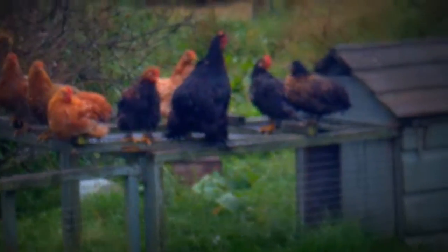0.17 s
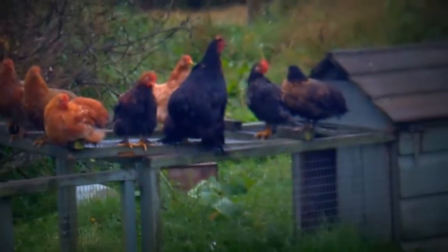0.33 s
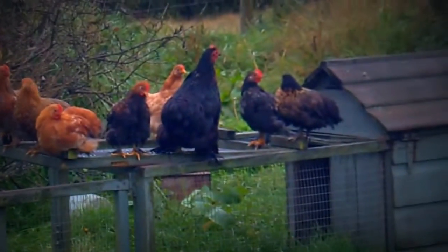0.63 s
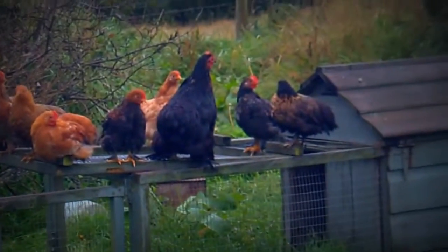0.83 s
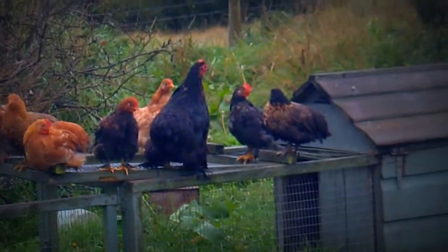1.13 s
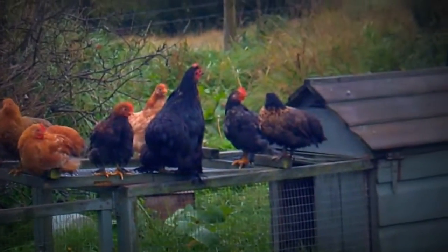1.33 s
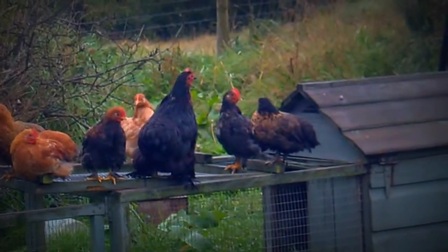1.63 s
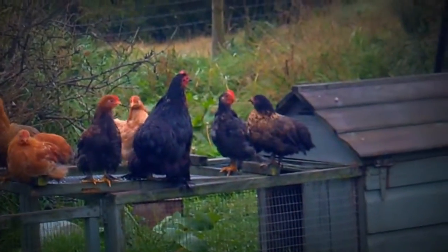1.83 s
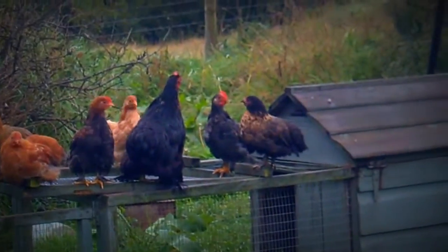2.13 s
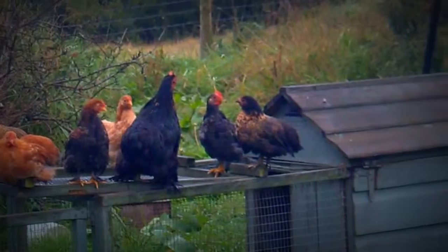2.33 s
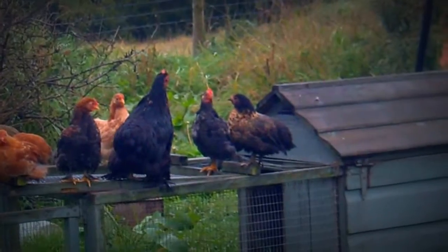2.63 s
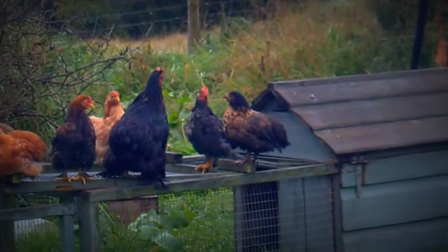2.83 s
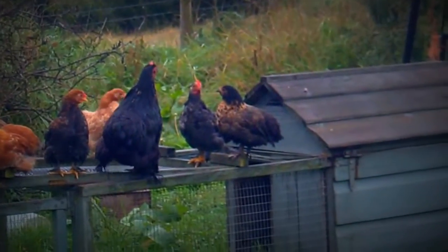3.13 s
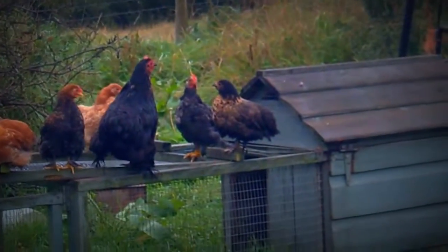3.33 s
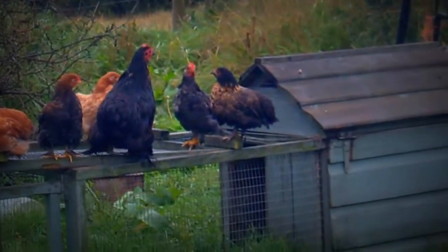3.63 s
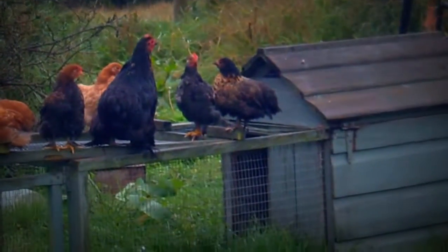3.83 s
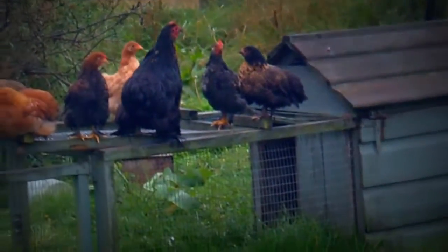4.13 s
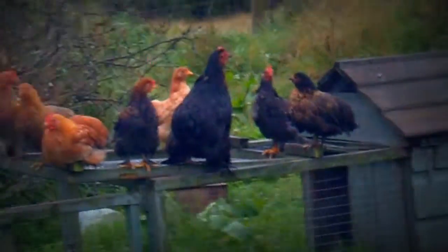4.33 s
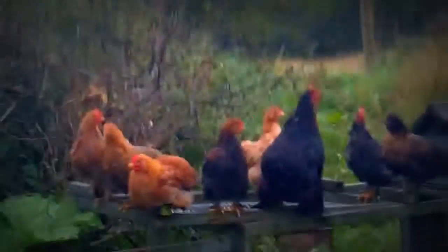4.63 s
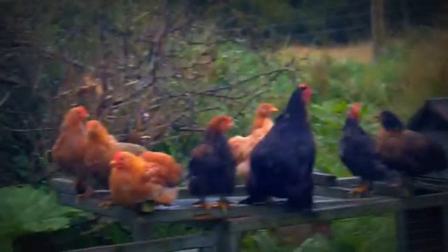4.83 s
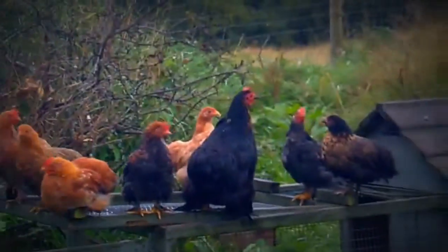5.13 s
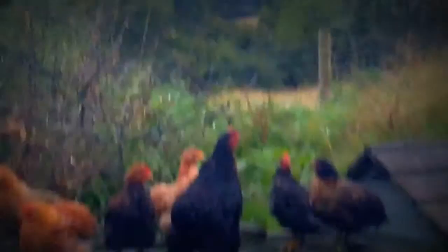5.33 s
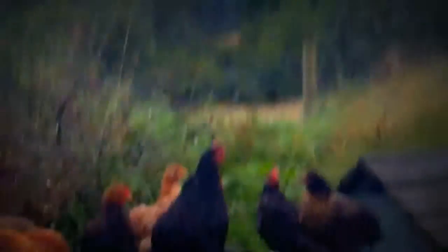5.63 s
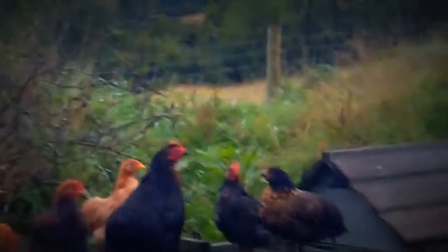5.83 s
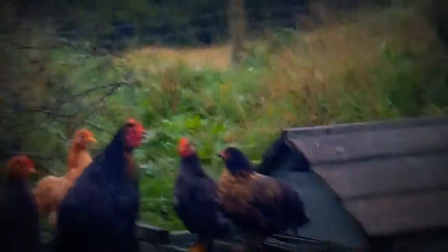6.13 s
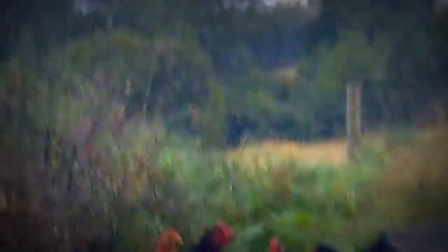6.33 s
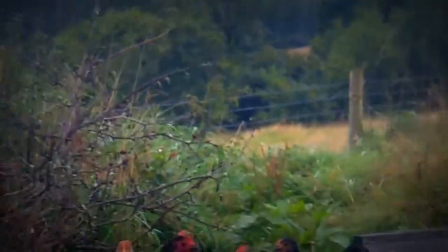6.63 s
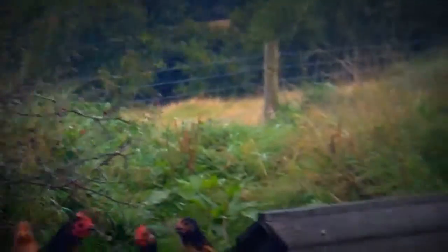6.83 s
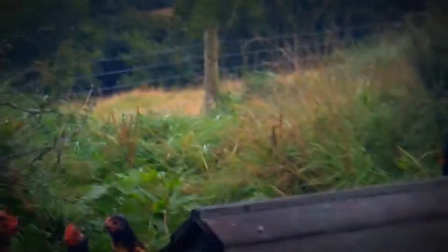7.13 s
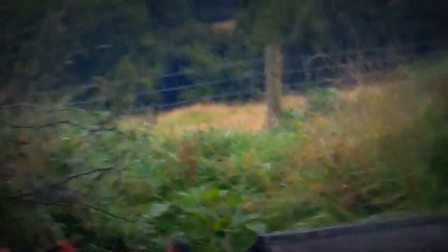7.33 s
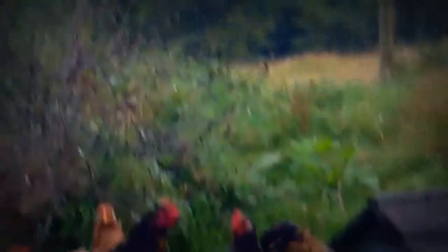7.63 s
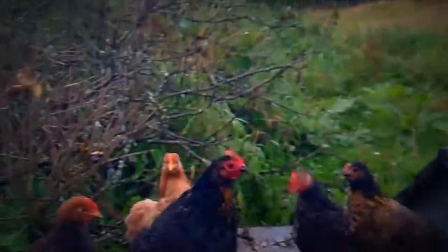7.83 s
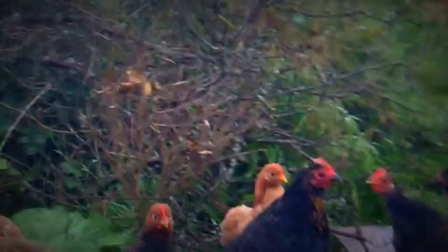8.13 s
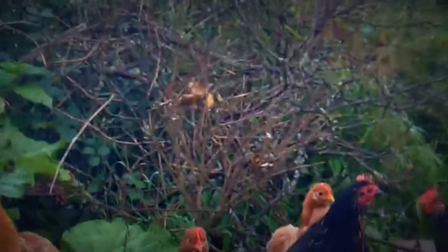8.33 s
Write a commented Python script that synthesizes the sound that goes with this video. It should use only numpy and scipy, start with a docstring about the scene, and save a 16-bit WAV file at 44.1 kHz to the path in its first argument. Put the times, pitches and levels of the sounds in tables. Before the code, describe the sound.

Hens call in alarm in an open garden: rising squawks that start hoarse, clear into a tone and crack, separated by short, arched clucks. Small distant birds trill and chirp between them. Coop, hedge and trees return short, faint echoes. Later come light taps and dry, grainy rustles. The microphone picks up low outdoor air, a barely audible drone and constant thin high electronic whine.

```python
"""A small bird trills further off as a hen in a garden ends a squawk; then come arched clucks, a buzzy cackle,
a second squawk, more clucks and a last squawk. Each long call starts hoarse, locks into a clearer tone and
breaks down; syrinx pulses ring through a filter for the throat, and coop, hedge and trees echo the birds.
Chirps, falling near-sines, are scattered through; from the middle on come light taps and soft rustles of noise.
Under it all lie quiet outdoor air, a faint distant drone and a thin whine like camera electronics."""
import sys
import numpy as np
from scipy import signal
from scipy.fft import rfft, irfft
from scipy.io import wavfile
from scipy.ndimage import uniform_filter1d, minimum_filter1d

SR = 44100
rng = np.random.default_rng(int(sys.argv[2]) if len(sys.argv) > 2 else 0)


def unload_audio(sound):
    """Save the sound as a 16-bit wav file, at the path given as the first command line argument."""
    columns = np.transpose(np.atleast_2d(sound))
    # keep every value between -1 and 1, then stretch to whole-number steps
    steps = np.round(np.clip(columns, -1, 1) * 32767)
    wavfile.write(sys.argv[1], SR, steps.astype(np.int16))


N = 374405
TIME = np.arange(N) / SR  # s

# Clucks, loud and muttered: start_s, hold_s, top_pitch_hz, level_db (below 3150 Hz),
# brightness_db (above 3150 Hz, relative to below), half_pitch_share at first (0-1), roughness (0-1)
CLUCKS = [(1.077, 0.033, 687.4, -34.5, 6, 0.5, 0.05), (1.327, 0.058, 845, -31.5, -0.5, 0.87, 0.3),
          (1.471, .014, 778, -55.5, 5.5, 0.4, 0.2), (1.639, .034, 831, -32, -0.5, 0.64, .2),
          (3.377, 0.034, 689, -33, 5.5, 0.27, 0.03), (3.626, 0.048, 837, -32.5, 1, 1, 0.26),
          (3.889, 0.048, 845, -33, 1.5, .45, 0.4), (4.216, .052, 856, -31.5, 0, 0.37, 0.22),
          (5.326, 0.0087, 697, -58, 6.5, 0.8, 0.7), (5.513, 0.0077, 688, -55, 5, 0.8, 0.5),
          (5.807, 0.036, 810, -75, 27, 0.6, 0.8), (5.905, 0.037, 815, -66.5, 18.5, .5, 0.56),
          (8.482, .02, 737, -62, 20.5, 0.6, 0.5)]
# Held part of each long call: time_s, pitch_hz, level_db, brightness_db (as for the clucks)
FIRST_SQUAWK = [(0.0, 780, -34, 4.5), (0.02, 841, -35, -1), (0.09, 1006, -27.5, 2.5),
                (0.188, 1016, -26, -2.5), (0.204, 1027, -26.5, -5), (0.219, 1139, -24.5, 0)]
CACKLE = [(1.826, 752.2, -46.5, 8), (1.838, 737, -47.5, 10), (1.86, 797, -35.5, 7.9),
          (1.902, 787.7, -32.5, 6.5), (1.938, 760.5, -41.5, 14), (1.96, 799, -34, 1.5)]
SECOND_SQUAWK = [(2.285, 724, -32.5, -0.5), (2.297, 823, -32, 0), (2.361, 867, -32, 0),
                 (2.371, 916, -32.5, 1.5), (2.403, 974.4, -28.5, 2), (2.475, 992, -26.5, 1.5),
                 (2.519, 971, -29, -2), (2.543, 918, -32, 6.5), (2.555, 946, -30.5, -2)]
LAST_SQUAWK = [(6.295, 717, -30.5, 4.9), (6.315, 709, -28, 1), (6.327, 765, -29, 6.1),
               (6.341, 680, -30, 8.2), (6.347, 714, -30, 1.7), (6.365, 897, -28.5, 11),
               (6.399, 933.3, -30, 18.8), (6.479, 967, -30.5, 16.3), (6.497, 993, -26.5, 8.4),
               (6.509, 1060, -20.5, 8.6), (6.519, 1119, -22, 7.1)]
# Voices of the first, second and last squawk, then the cackle: locks_at_s, hoarse_roughness (0-1),
# locked_roughness (0-1), hoarse_half_pitch_share (0-1), locked_half_pitch_share (0-1),
# strained_roughness at the end (0-1), attack_s, release_s, fundamental_weight_db
LONG_CALL_VOICES = [(0.049, .24, 0.08, 0, 0.01, .8, .02, 0.032, 2),
                    (2.375, .29, .05, 0.01, 0.01, 0.18, 0.0221, 0.037, -1.5),
                    (6.358, 0.22, 0.09, 0.3, 0.03, 0.27, .027, 0.033, -0.5),
                    (1.845, 0.64, .16, 0.2, 0.34, 0.7, 0.0159, 0.02, -1)]
# Throat resonances with the beak open, for each kind of call: frequency_hz, gain_db
CLUCK_THROAT = [(400, -49.5), (680, -14.5), (850, -6), (1100, -2), (1700, 2.5), (2100, -9.5), (2600, -29),
                (3000, 2), (3400, -4.5), (4150, 7), (5000, -2), (5600, -14.5), (6400, -24), (13000, -35)]
SQUAWK_THROAT = [(400, -32.5), (700, -11), (950, -3.5), (1450, 0.5), (2200, -3.5), (2600, -17), (3000, -4),
                 (3900, 2.5), (4800, 5), (5300, -3), (5800, -14.5), (6500, -26.5), (8500, -27),
                 (13000, -38.5)]
CACKLE_THROAT = [(400, -36), (790, -7.5), (1200, -20), (1600, 5.5), (2000, 1), (2600, -18.5), (3200, -2),
                 (4000, 1), (4750, 10), (5500, 5.5), (6400, -15.5), (13000, -31.5)]
# Throat with the beak nearly shut: frequency_hz, gain_db
NARROW_THROAT = [(400, -37.5), (690, -12), (1050, 2.5), (1400, 4.5), (2150, -8), (2600, -15.5), (3000, 0.5),
                 (3550, -7), (4100, 5), (4750, 10.5), (5500, -14.5), (6300, -30), (13000, -38.5)]
# Hiss of turbulence at the syrinx: frequency_hz, gain_db
RASP_COLOUR = [(600, -2), (1500, -6.5), (2500, 5.5), (3500, 7.5), (4550, 1.5), (5500, 11.5), (7000, 8.5),
               (13000, -7)]
# Falling chirps of small birds: start_s, length_s, start_pitch_hz, end_pitch_hz, peak_level_db
CHIRPS = [(0.696, 0.068, 3700, 2950, -48), (0.858, 0.024, 4800, 3980, -49.5),
          (0.873, 0.053, 3700, 3000, -50.5), (1.797, 0.033, 4200, 2990, -47),
          (4.564, 0.18, 3900, 3820, -58), (5.03, 0.026, 5350, 5000, -53), (5.117, 0.043, 5350, 4950, -56),
          (5.192, 0.029, 5300, 4920, -54), (6.914, 0.17, 3970, 3960, -56), (7.565, 0.023, 5450, 4900, -53),
          (7.58, 0.047, 4450, 4130, -60)]
# Echoes from ground, coop and hedge: delay_s, level_db
EARLY_ECHOES = [(.0034, -17.5), (0.0125, -33), (0.022, -20.5)]
# Light taps: start_s, peak_level_db (before a shared trim)
TAPS = [(4.699, -33), (4.81, -36.5), (4.858, -35.5), (6.9846, -47.5), (7.2764, -34), (8.358, -40)]
# Soft rustles: start_s, peak_s, end_s, peak_level_db (before a slight flutter)
RUSTLES = [(5.66, 5.695, 5.884, -43), (6.644, 6.797, 7.06, -49.5), (7.048, 7.16, 7.3, -45),
           (7.313, 7.373, 7.8, -56), (7.93, 8.036, 8.1, -49), (8.014, 8.127, 8.35, -48)]
# Spectrum of rustles, taps and trill clicks: frequency_hz, gain_db
RUSTLE_COLOUR = [(300, -24.5), (1000, -12), (2500, -11), (3700, -6.5), (4600, 1), (5600, -10.5),
                 (7000, -14.5), (13000, -25)]
# Spectrum of the outdoor air: frequency_hz, gain_db
AIR_COLOUR = [(15, -46.5), (25, -7.5), (98, -9), (128, -9.5), (158, -7.5), (366, -5.5), (490, -4.5),
              (573, -5.5), (2380, -11), (5100, -13.5), (6130, -16.5), (6990, -19.5), (7570, -10),
              (8190, -19), (13500, -20)]
# Faint distant drone: time_s, level_db (before a slow wander)
DRONE = [(0, -86), (2.5, -80), (3.6, -75.5), (5.3, -74.5), (6.9, -79), (8.4, -85.5)]

TOP_HZ = 13850  # upper limit of the microphone chain and of the syrinx partials
LEAD_S = 0.035  # room for the attack ahead of each held part

# A cluck arches up to its top pitch, swells a little and loses its half pitch on the way
REST_HZ, ARCH_SHARE, ARCH_TOP_SHARE = 680, 0.62, 0.6
SWELL_DB, SWELL_S, UNDOUBLE_S = 4, 0.011, 0.016
CLUCK_ATTACK_S, CLUCK_RELEASE_S, CLUCK_WEIGHT_DB = 0.01986, 0.025, 1

# Pace of the lock and of the final strain in a long call
LOCK_S, CRACK_ROUGH, STRAIN_S = 0.0091, 0.11, 0.01

# Every call opens low, dull and broken; the dB values are reductions
ATTACK_HZ, ATTACK_DB, ATTACK_DULL_DB = 630, 17.5, 15
ATTACK_BEND, ATTACK_HALF, ATTACK_ROUGH = 1.3, 1, 0.74

# Every call ends in a break to slack pitch, falling level and thin rasp
RELEASE_DB, RELEASE_BEND, RELEASE_THIN_DB = 24, 1.27, 7
BREAK_S, BREAK_HZ, BREAK_HALF, BREAK_ROUGH = 0.015, 508, 0.74, 0.95

# The dry trill: evenly spaced notes with a little scatter in time and strength
TRILL_START_S, TRILL_NOTE_S, TRILL_DB = 0.24, 0.0338, -39.5
TRILL_SCATTER_S, TRILL_SCATTER_DB = 0.0023, 1.5

AIR_DB = -57
WHINE_HZ, FLIPS_PER_S = 7689.6, 29.297


def hens():
    """Place the clucks, the three squawks and the cackle in time."""
    out = np.zeros(N)
    for start, *settings in CLUCKS:
        add(out, start - LEAD_S, cluck(*settings))
    curves = (FIRST_SQUAWK, SECOND_SQUAWK, LAST_SQUAWK, CACKLE)
    throats = (SQUAWK_THROAT, SQUAWK_THROAT, SQUAWK_THROAT, CACKLE_THROAT)
    for curve, voice, throat in zip(curves, LONG_CALL_VOICES, throats):
        add(out, curve[0][0] - LEAD_S, squawk(curve, voice, throat))
    return out


def squawk(curve, voice, throat, size=15500):
    """A long call, hoarse until the syrinx locks into a steadier tone and rough again under the final strain."""
    times, *columns = np.transpose(curve)
    (locks_at, hoarse_rough, locked_rough, hoarse_half, locked_half,
     strain_rough, attack, release, weight_db) = voice
    t = times[0] + TIME[:size] - LEAD_S
    hz, db, bright_db = (np.interp(t, times, column) for column in columns)
    locked = (1 + np.tanh((t - locks_at) / LOCK_S)) / 2
    strain = np.exp(np.minimum(t - times[-1], 0) / STRAIN_S)
    half = blend(hoarse_half, locked_half, locked)
    # the voice cracks as it changes register
    crack = CRACK_ROUGH / np.cosh((t - locks_at) / LOCK_S)
    rough = blend(hoarse_rough, locked_rough, locked) + crack
    rough = blend(rough, strain_rough, strain)
    hold = times[-1] - times[0]
    shape = open_and_break(t - times[0], attack, hold, release, hz, db, bright_db, half, rough)
    return call(*shape, throat, weight_db)


def cluck(hold, top_hz, db, bright_db, half, rough, size=6000):
    """A short call on one arch of pitch; the higher its top, the steeper the arch."""
    t = TIME[:size] - LEAD_S
    held = np.clip(t, 0, hold)
    from_top = held / hold / ARCH_TOP_SHARE - 1
    hz = top_hz - ARCH_SHARE * (top_hz - REST_HZ) * from_top ** 2
    db = db - SWELL_DB * np.exp(-held / SWELL_S)
    half = half * np.exp(-(held / UNDOUBLE_S) ** 2 / 2)
    shape = open_and_break(t, CLUCK_ATTACK_S, hold, CLUCK_RELEASE_S, hz, db, bright_db, half, rough)
    return call(*shape, CLUCK_THROAT, CLUCK_WEIGHT_DB)


def open_and_break(t, attack, hold, release, hz, db, bright_db, half, rough):
    """Put a scooping attack before the held part of a call (t from 0 to hold) and a collapse after it."""
    early = np.maximum(-t, 0) / attack
    late = np.maximum(t - hold, 0)
    opening = np.minimum(early, 1)
    broken = 1 - np.exp(-late / BREAK_S)
    thinning = np.minimum(late / release, 1)

    hz = blend(blend(hz, ATTACK_HZ, opening), BREAK_HZ, broken)
    db = db - ATTACK_DB * early ** ATTACK_BEND - RELEASE_DB * (late / release) ** RELEASE_BEND
    bright_db = bright_db - ATTACK_DULL_DB * early ** 2 + (RELEASE_THIN_DB - bright_db) * thinning
    half = blend(blend(half, ATTACK_HALF, opening), BREAK_HALF, broken)
    rough = blend(blend(rough, ATTACK_ROUGH, opening), BREAK_ROUGH, broken)
    return hz, db, bright_db, half, rough


def call(hz, db, bright_db, half, rough, throat, weight_db,
         chest_hz=1250, split_hz=3150, narrow_hz=700, open_hz=790):
    """The beak opens as the pitch climbs, and effort lifts the upper resonances over the lower ones."""
    half, rough = np.clip([half, rough], 0, 1)
    source = syrinx(hz, half, rough) + gulp(hz, rough)
    source = source + (undb(weight_db) - 1) * below(source, chest_hz)
    beak = np.interp(hz, [narrow_hz, open_hz], [0, 1])
    voice = colour(source * beak, throat) + colour(source * (1 - beak), NARROW_THROAT)
    low = below(voice, split_hz)
    high = voice - low
    return (even(low) + undb(bright_db) * even(high)) * undb(db)


def syrinx(hz, half, rough, flutter=0.0041, shimmer_db=2, split=0.087, order=18):
    """Membrane pulses: unequal alternate pulses add lines at half pitch, chaos shakes the period and adds rasp."""
    count = len(hz)
    jitter, rasp = 0.022 * rough, 0.62 * rough
    hz = hz * (1 + jitter * walk(count, 1000) + flutter * walk(count, 129.1))
    phase = 2 * np.pi * np.cumsum(hz) / SR

    k = np.arange(1, 2 * order + 1)[:, None] / 2  # multiples of the pitch, in half steps
    # hoarseness splits the high partials first
    between = np.minimum(half + split * rough * k, 1)
    strength = np.where(k % 1 == 0, 1, between) * (k * hz < TOP_HZ)
    # the pulse shape never settles, so each partial swells and sinks on its own
    shimmer = np.array([walk(count, 90.6) for _ in k])
    strength = strength * undb(shimmer_db * (0.78 + rough) * shimmer)

    # in a hoarse voice the sharp edge of each pulse scatters: high partials smear, low ones stay clean
    smear = 3 * rough ** 1.4 * np.clip((k * hz - 2600) / 2200, 0, 1)
    scatter = np.array([walk(count, 550) for _ in k])
    tone = (strength * np.cos(k * phase + smear * scatter)).sum(axis=0)

    # turbulence comes in puffs at half pitch
    puffs = rng.standard_normal(count) * (1 + 1.6 * np.cos(phase / 2))
    return tone / np.sqrt(order / 2) + rasp * colour(puffs, RASP_COLOUR)


def gulp(hz, rough, gulp_db=-3, multiple=1.95, waver=0.0395):
    """The broken voice, as the beak opens and shuts, rings a low throat resonance that slides with the larynx."""
    ring_hz = multiple * hz * (1 + waver * walk(len(hz), 400))
    ring = np.sin(2 * np.pi * np.cumsum(ring_hz) / SR)
    return undb(gulp_db) * rough ** 2 * ring


def songbirds(second_db=-4, click_db=-8, count=13):
    """Small birds further off: a trill of very short, dry, doubled down-sweeps, and scattered chirps."""
    out = np.zeros(N)
    for note, (slip, strength) in enumerate(rng.standard_normal((count, 2))):
        start = TRILL_START_S + note * TRILL_NOTE_S + TRILL_SCATTER_S * slip
        db = TRILL_DB + TRILL_SCATTER_DB * strength
        first, second = (whistle(0.004, start_hz=4900, end_hz=3950, waver=0.04) for _ in range(2))
        add(out, start - 0.002, undb(db) * first)
        add(out, start + 0.004, undb(db + second_db) * second)
        click = level(colour(rng.standard_normal(SR // 100), RUSTLE_COLOUR), db + click_db)
        add(out, start - 0.002, click * np.hanning(len(click)))
    for start, length, start_hz, end_hz, db in CHIRPS:
        add(out, start, undb(db) * whistle(length, start_hz, end_hz))
    return out


def whistle(length, start_hz, end_hz, waver=0.026):
    """A small bird's note: a near sine that falls fast and then levels out."""
    u = np.linspace(0, 1, int(length * SR))
    hz = end_hz + (start_hz - end_hz) * (1 - u) ** 1.6
    hz = hz * (1 + waver * walk(len(u), 660))
    return np.sin(2 * np.pi * np.cumsum(hz) / SR) * np.sin(np.pi * u)


def garden(x, near_db=-20, near_t60=0.09, far_db=-27.0, far_t60=0.51, far_hz=4000):
    """Early echoes, quick scatter from the coop and a faint, duller tail from the trees; t60 in seconds."""
    t = TIME[:SR]
    near, far = (rng.standard_normal(SR) * undb(-60 * t / t60) * np.minimum(t / 0.016, 1)
                 for t60 in (near_t60, far_t60))
    far = band(far, 380, far_hz, order=1)
    response = (level(near, near_db) + level(far, far_db)) / np.sqrt(SR)
    for delay, db in EARLY_ECHOES:
        response[int(delay * SR)] += undb(db)
    return x + signal.fftconvolve(x, response)[:N]


def rustles(tap_db=-8, tap_decay=0.0058):
    """Noise under slow swells makes soft grainy rustles; sharp decays (in seconds) make light taps."""
    swell = sum(undb(db) * np.interp(TIME, [start, peak, end], [0, 1, 0]) for start, peak, end, db in RUSTLES)
    swell = swell * undb(0.5 * walk(N, 120))
    for start, db in TAPS:
        add(swell, start, undb(db + tap_db) * np.exp(-TIME[:SR // 20] / tap_decay))
    return swell * level(colour(rng.standard_normal(N), RUSTLE_COLOUR), 0)


def air(leaves_db=-65):
    """Quiet outdoor air: coloured noise, a light wavering hiss of leaves and a distant unsteady drone."""
    bed = level(colour(rng.standard_normal(N), AIR_COLOUR), AIR_DB)
    bed = bed * undb(0.12 * walk(N, 1.96))
    leaves = level(band(rng.standard_normal(N), 3900, 4900), leaves_db)
    leaves = leaves * undb(1.8 * walk(N, 14))
    drone_hz = 134.6 * (1 + 0.0142 * walk(N, 12))
    drone = np.sqrt(2) * np.sin(2 * np.pi * np.cumsum(drone_hz) / SR)
    drone_db = np.interp(TIME, *np.transpose(DRONE)) + 2 * walk(N, 9.7)
    return bed + leaves + drone * undb(drone_db)


def whine(whine_db=-48.0):
    """A thin high whine, like camera electronics: one tone that flips its sign at a steady rate."""
    flips = np.sign(np.sin(np.pi * FLIPS_PER_S * TIME))
    tone = flips * np.sin(2 * np.pi * WHINE_HZ * TIME)
    return undb(whine_db) * band(tone, 5770, 8030)


def undb(db):
    """Decibels to gain."""
    return 10 ** (np.asarray(db) / 20)


def level(x, db):
    """Scale to an rms level."""
    return x * undb(db) / np.sqrt(np.mean(x ** 2))


def even(x):
    """Hold the strength of a sound at 1 over about 10 ms."""
    return x / np.sqrt(uniform_filter1d(x ** 2, size=440) + 1e-12)


def blend(a, b, share):
    """Go from a to b as the share goes from 0 to 1."""
    return a + (b - a) * share


def add(out, start, x):
    """Mix x into out from a start time in seconds, trimming what falls outside."""
    i = int(start * SR)
    x, i = x[max(-i, 0):], max(i, 0)
    out[i:i + len(x)] += x[:max(N - i, 0)]


def walk(count, rate):
    """Smooth random wander with a spread near 1, through rate random points a second."""
    at = np.arange(count) * rate / SR
    points = rng.standard_normal(int(at[-1]) + 2)
    return 1.3 * np.interp(at, np.arange(len(points)), points)


def colour(x, points):
    """Causal filter with a spectrum of (Hz, dB) points: its resonances ring after each pulse."""
    hz, db = np.transpose(points)
    f = np.maximum(np.fft.rfftfreq(2048, 1 / SR), 1)
    gain = undb(np.interp(np.log(f), np.log(hz), db))
    # folding the cepstrum onto positive times gives the minimum-phase response
    cepstrum = irfft(np.log(gain))
    causal = 1 + np.sign(np.fft.fftfreq(len(cepstrum)))
    response = irfft(np.exp(rfft(cepstrum * causal)))
    return signal.fftconvolve(x, response)[:len(x)]


def band(x, lo_hz, hi_hz, order=2):
    """Band-pass filter."""
    return signal.sosfilt(signal.butter(order, [lo_hz, hi_hz], "band", fs=SR, output="sos"), x)


def below(x, hz):
    """Steep low-pass without delay."""
    return signal.sosfiltfilt(signal.butter(8, hz, fs=SR, output="sos"), x)


def scene():
    """Hens and small birds echo in the garden, over the dry rustles, air and whine."""
    birds = garden(hens() + songbirds())
    return (birds + rustles() + air() + whine())[None]


def record(dry):
    """The camera's limiter holds down the loudest peaks, and the top is cut."""
    room = np.minimum(1, 0.71 / (np.abs(dry) + 1e-9))
    gain = uniform_filter1d(minimum_filter1d(room, size=220), size=220)  # about 5 ms
    return signal.sosfilt(signal.ellip(10, 0.2, 70, TOP_HZ, fs=SR, output="sos"), dry * gain)


dry = scene()
out = record(dry)
unload_audio(out)
```